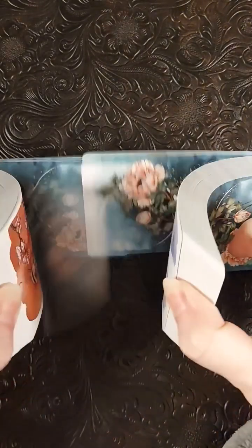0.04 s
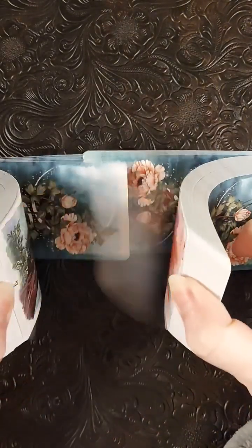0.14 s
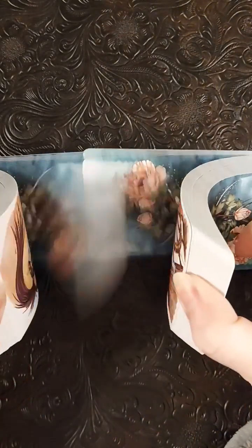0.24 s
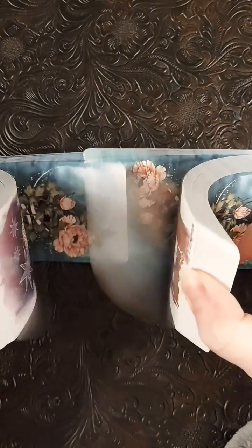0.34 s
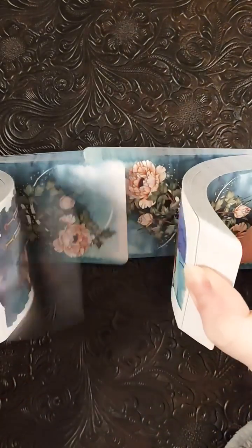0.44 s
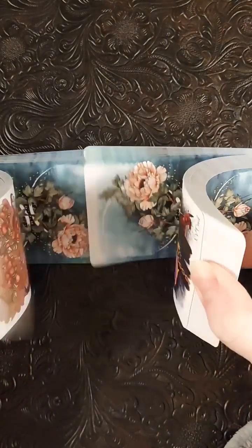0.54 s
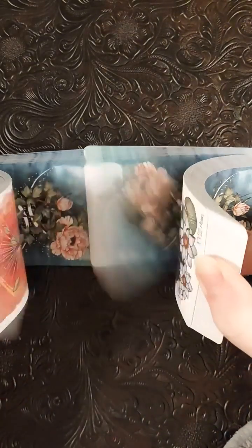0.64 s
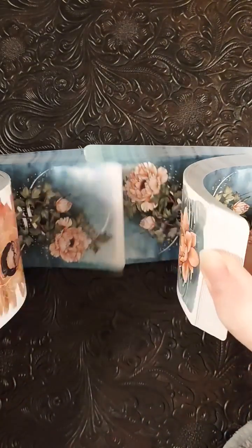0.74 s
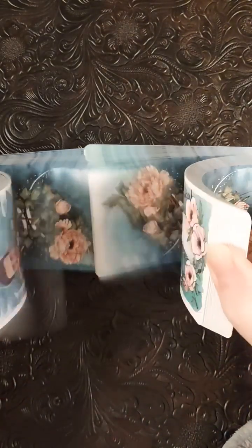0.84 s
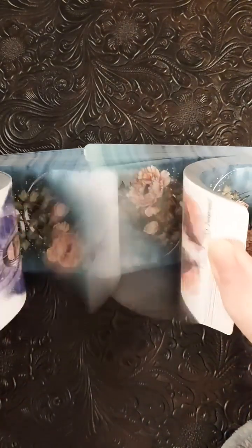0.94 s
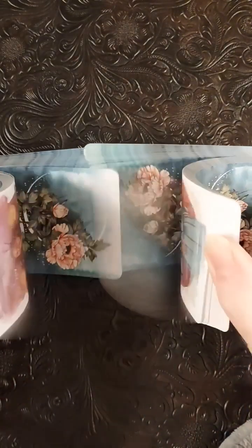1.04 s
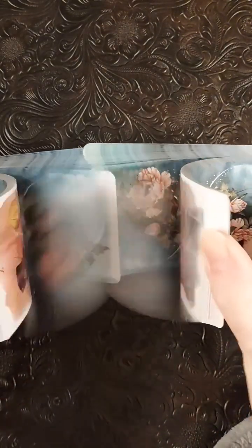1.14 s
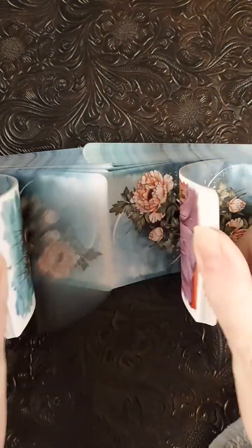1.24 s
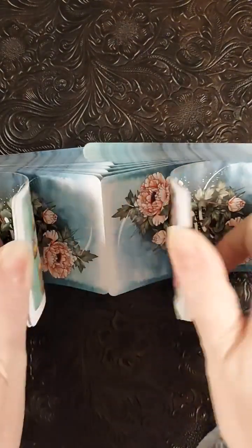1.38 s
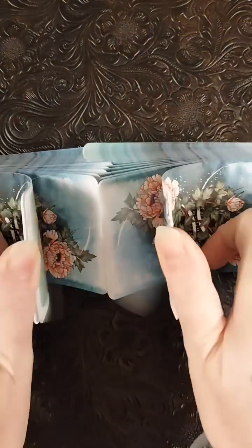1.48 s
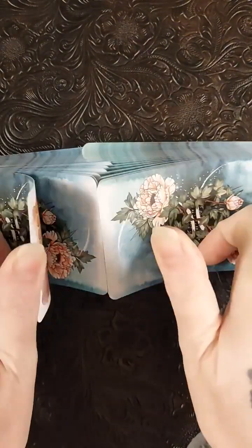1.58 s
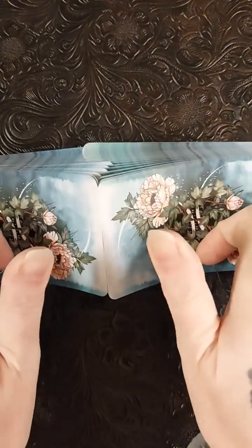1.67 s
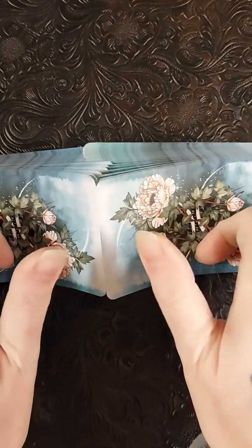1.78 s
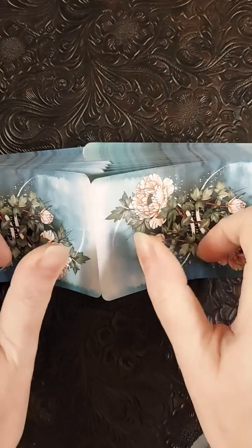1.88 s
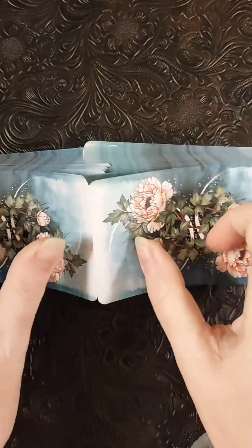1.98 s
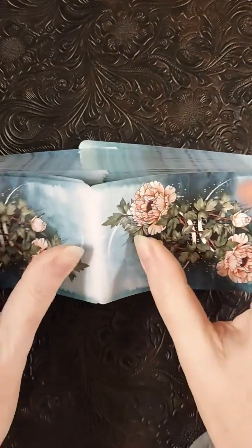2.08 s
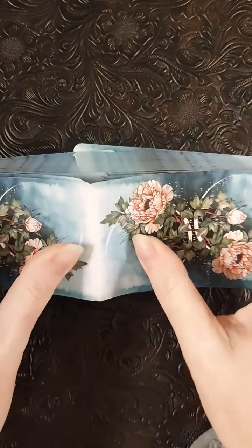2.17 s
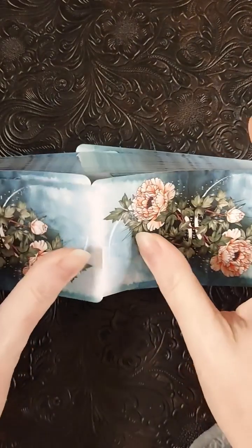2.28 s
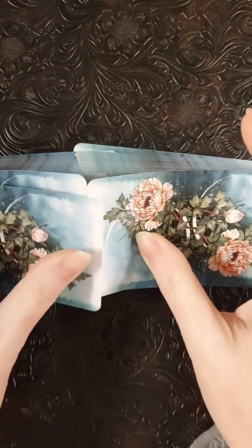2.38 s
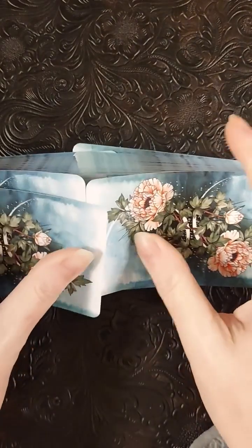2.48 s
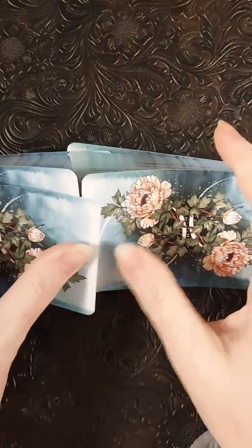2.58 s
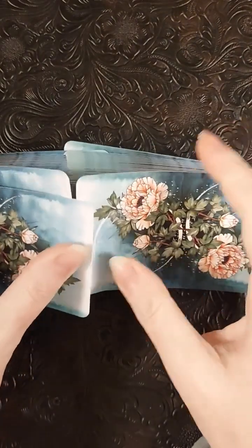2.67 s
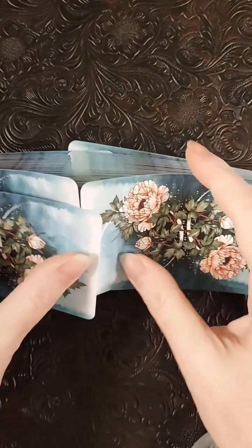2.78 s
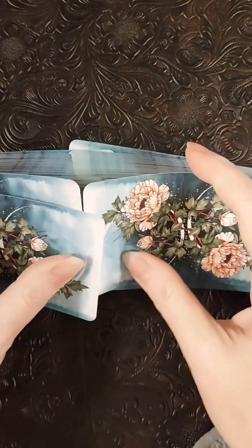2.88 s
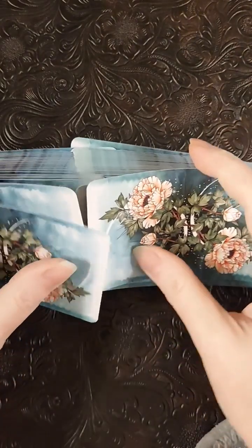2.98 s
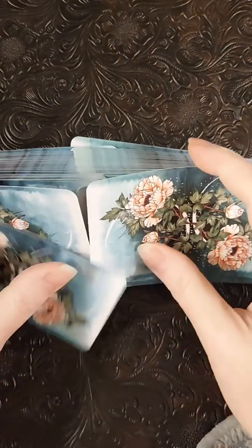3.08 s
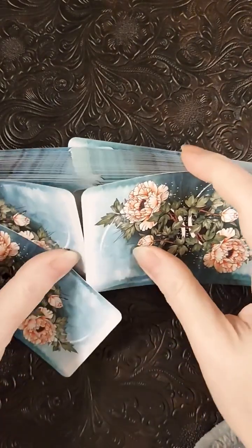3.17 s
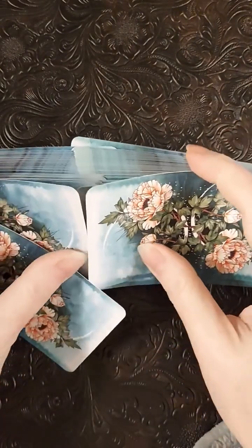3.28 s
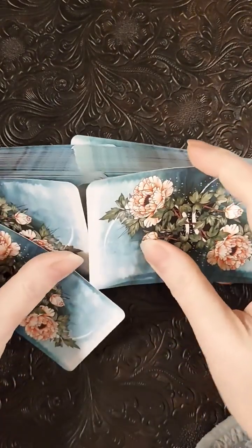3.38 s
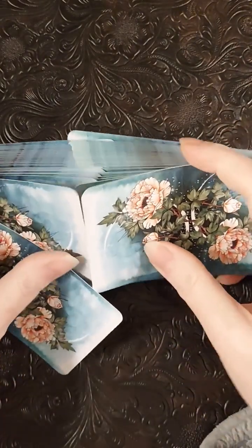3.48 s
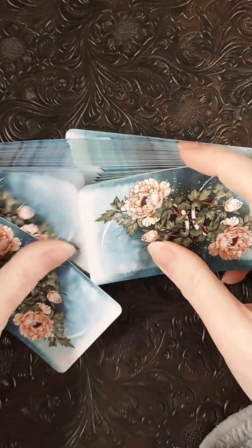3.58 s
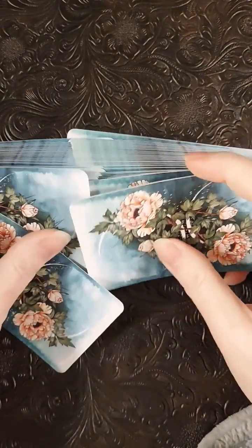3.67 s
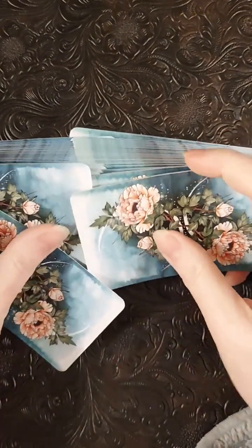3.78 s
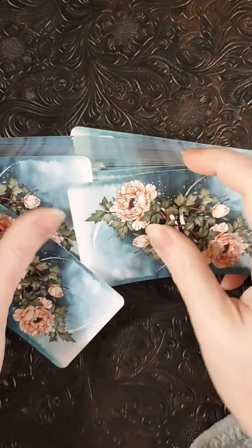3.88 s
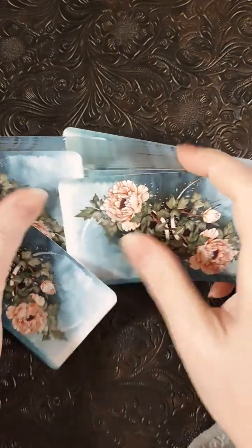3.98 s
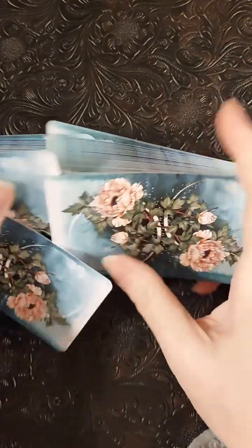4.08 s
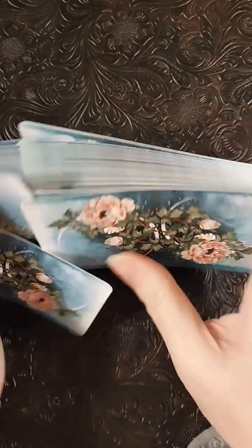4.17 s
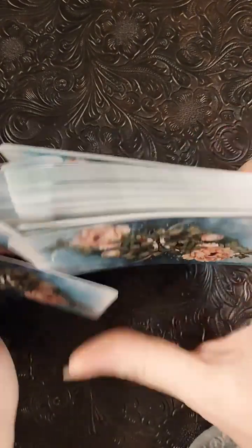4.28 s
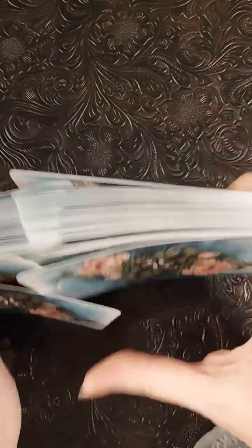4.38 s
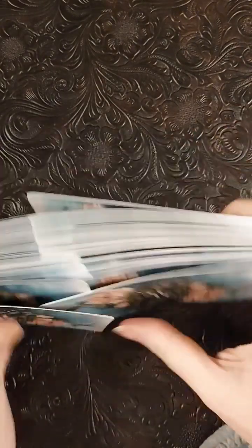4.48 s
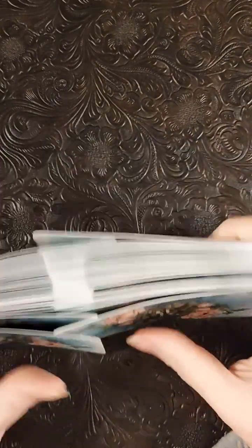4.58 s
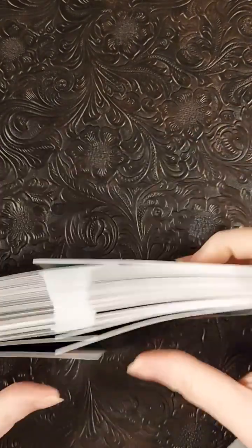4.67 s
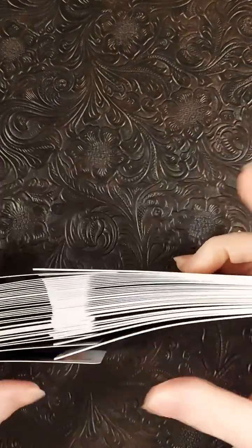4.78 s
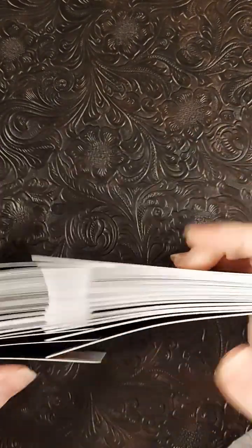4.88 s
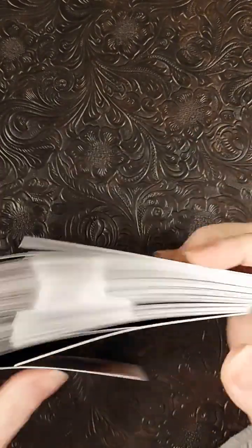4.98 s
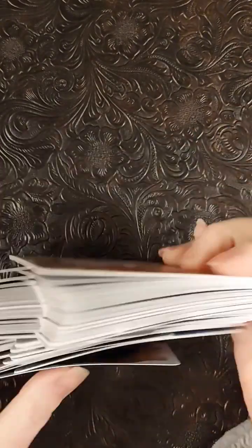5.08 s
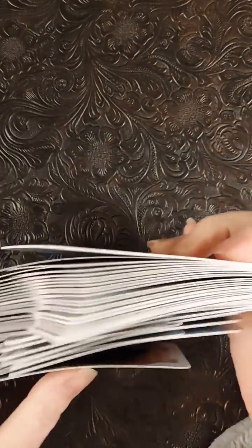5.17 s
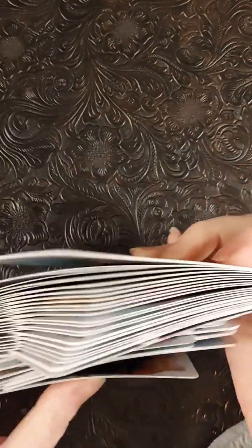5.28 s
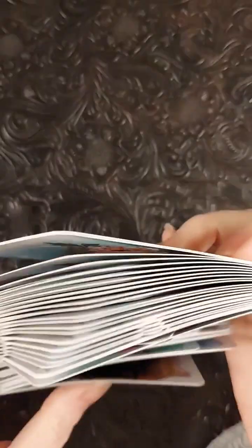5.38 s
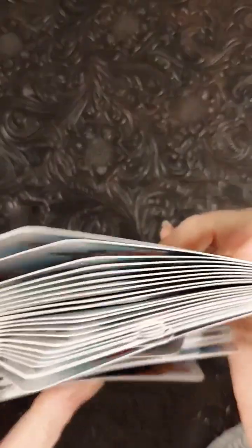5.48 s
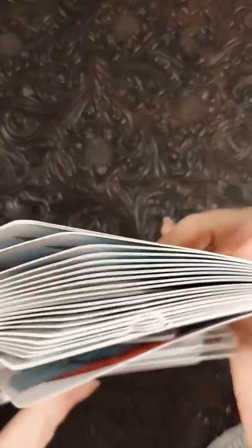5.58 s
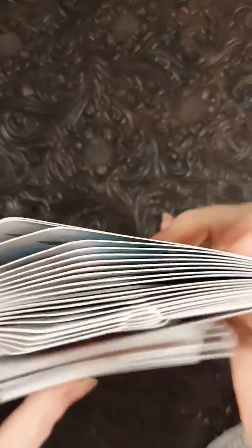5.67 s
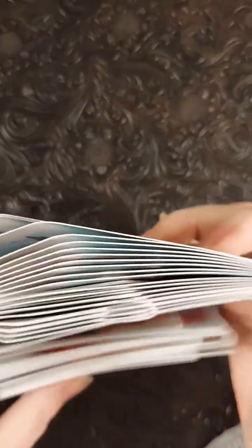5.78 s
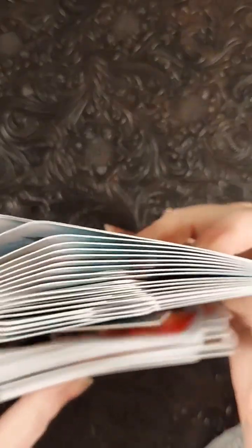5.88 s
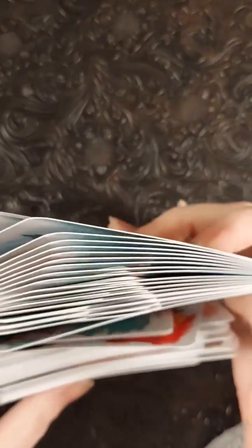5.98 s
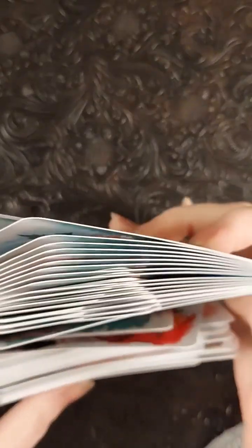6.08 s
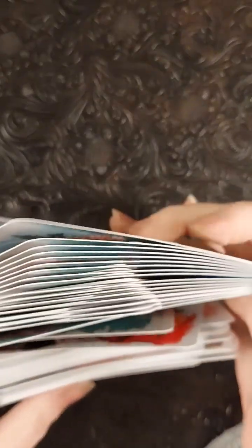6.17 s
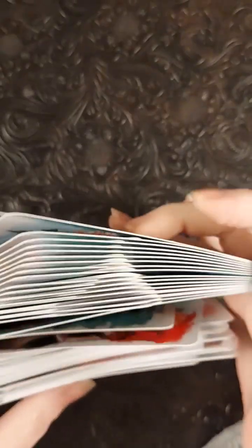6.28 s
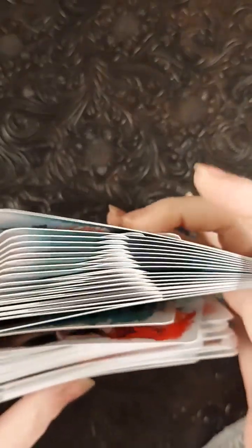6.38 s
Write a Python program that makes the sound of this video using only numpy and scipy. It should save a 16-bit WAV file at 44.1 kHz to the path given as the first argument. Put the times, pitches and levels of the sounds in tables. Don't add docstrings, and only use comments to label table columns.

```python
import sys
import numpy as np
from scipy import signal
from scipy.fft import rfft, irfft, next_fast_len
from scipy.io import wavfile
from scipy.ndimage import uniform_filter1d, map_coordinates

SR = 44100
rng = np.random.default_rng(int(sys.argv[2]) if len(sys.argv) > 2 else 0)


def pcm_store(signal):
    levels = np.round(np.clip(np.atleast_2d(signal), -1, 1) * 32767)
    wavfile.write(sys.argv[1], SR, levels.astype(np.int16).T)


def invert_db(level):
    return 10 ** (np.asarray(level, dtype=float) / 20)


N = 284004
LIFTED_S, LEFT_LEAD_SAMPLES = 4.25, 5
HUM_HZ = 91.5
LOW_RINGS_LONGER = 0.36
SOFT_LINGERS = 0.15
START_DB_PER_S, STOP_DB_PER_S = 419, 796.5
SKID_START_DB_PER_S, SKID_STOP_DB_PER_S = 1500.5, 2500

# (time [s], level [dB])
HUM_LEVEL = [(0, -53), (0.5, -61.5), (1, -54.5), (1.5, -59.5), (2, -55), (2.5, -56.5), (3, -52.5),
             (3.5, -53), (4, -52.5), (4.4, -60), (5, -54.5), (5.25, -56), (5.6, -61), (6, -64),
             (6.15, -80.5), (6.44, -72)]
# (multiple of its pitch, level [dB])
HUM_OVERTONES = [(1, -0.5), (2, -21)]
# (frequency [Hz], level [dB])
ROOM_COLOUR = [(12, -36), (20, -15), (60, 1.5), (108, -2), (189, -10.5), (258, -12), (535, -25.5),
               (670, -30.5), (2010, -33.5), (2510, -37), (2730, -35), (5210, -40), (14300, -48.5),
               (16000, -56.5)]
# (frequency [Hz], likeness [0-1])
ROOM_LIKENESS = [(30, .75), (60, 1), (200, 0.81), (600, 0.27), (2000, 0.11), (8000, 0.05)]
# (frequency [Hz], time to fall 60 dB [s])
ECHO_TIMES = [(150, 0.13), (1000, 0.24), (4500, 0.056), (8000, 0.12)]

# (full speed from [s], held [s], scrape [dB], hiss above scrape [dB])
FACE_STROKES = [(0, 0.56, -55, -2), (.76, 0.064, -54, -7.5), (0.9, 0.085, -56.5, -0.5),
                (1.26, .2, -67.5, -14), (1.47, 0.14, -58, 5), (1.862, 0.038, -57, -4.5),
                (1.911, 0.05, -59, 6.5), (2.089, 0.16, -61.5, 3), (2.995, 0.11, -64, 1),
                (3.13, 0.071, -70, 12), (3.219, 0.044, -62, -15), (3.49, 0.14, -68.5, -13),
                (3.675, 0.086, -61, -7), (5.09, 0.055, -55.5, 4.5), (3.89, 0.14, -62, -5),
                (4.05, 0.13, -70.5, -1), (4.315, 0.027, -60, -9.5), (4.49, 0.061, -55, 6),
                (4.568, 0.059, -48.5, -6), (4.66, 0.12, -66, 0.5), (5.005, 0.089, -55, 12.5),
                (5.16, 0.13, -59, 1), (5.3, 0.076, -56.5, 7.5), (5.398, 0.032, -45, -6.5),
                (5.47, 0.16, -63.5, -11), (5.65, 0.07, -61, 7.5), (5.753, 0.034, -57, 15),
                (5.82, 0.04, -60.5, 10.5), (5.89, 0.024, -47.5, -6.5), (5.969, 0.056, -64.5, 12),
                (6.17, 0.078, -75, -5), (6.428, 0.058, -61.5, -5.5), (1.899, 4.15, -75.5, -6.5)]
# (from [s], held [s], scrape [dB],
# hiss above scrape [dB])
CARD_SLITHERS = [(.036, 0.0074, -55.5, 9.5), (.112, 0.01, -61, 5), (.155, 0.011, -61, 0),
                 (.22, 0.019, -68, 8), (.252, .006, -62, 24), (.276, 0.01, -59, 9), (.312, .022, -65, 4),
                 (.39, 0.047, -52, 2), (.45, 0.025, -50.5, 12.5), (.512, 0.013, -54, 12),
                 (.547, 0.017, -67, 3), (.675, 0.016, -42, -1), (.722, 0.042, -54, -4),
                 (.772, 0.011, -34.5, 1), (.834, 0.0073, -63, 2), (.866, 0.018, -65, 2),
                 (.918, .008, -53, 12), (.942, 0.015, -50, 10.5), (.962, 0.012, -30.5, 0.5),
                 (1.004, 0.0097, -56, 22.5), (1.04, 0.027, -52.5, 12.5), (1.115, 0.0052, -56, -1),
                 (1.147, 0.019, -50, -1), (1.244, 0.0067, -44, 15), (1.262, 0.026, -52, 6),
                 (1.328, 0.011, -40, 9), (1.345, 0.013, -40.5, -4), (1.39, 0.059, -54.5, 6.5),
                 (1.452, 0.0064, -48, 14), (1.525, 0.009, -63, 1), (1.595, 0.0079, -55, 7),
                 (1.722, 0.029, -63.5, 2), (1.835, 0.018, -55.5, -7.5), (2.243, 0.016, -45, -8.5),
                 (2.056, 0.0058, -58.5, -3.5), (2.175, 0.0044, -58, -5.5), (2.32, 0.0041, -66.5, 5.5),
                 (3.23, 0.022, -68, -27), (4.97, 0.024, -60.5, 9), (5.035, 0.04, -58.5, 11.5),
                 (5.215, 0.083, -64, 11.5), (5.585, 0.04, -66.5, 15), (5.705, 0.031, -57.5, 11),
                 (5.915, 0.037, -59.5, 11.5), (6.0, 0.027, -67, 13), (6.028, 0.02, -57, 10),
                 (6.055, 0.011, -72, 9.5), (1.291, 0.012, -37, 11), (1.421, 0.0092, -42.5, 10.5),
                 (5.562, 0.024, -70.5, 14.5), (5.845, 0.01, -50, -5), (3.685, 0.014, -52, -8)]
# (time [s], share of lower resonance [0-1], treble above 9 kHz [dB])
RUB_COLOUR = [(0, 0.87, -0.5), (.9, 0.4, 3.5), (1.7, 0, 1), (1.85, 0.14, -19.5), (3.3, 0.27, -2),
              (3.7, 0.99, -9.5), (4.3, 1, -4), (4.6, 0.2, -5.5), (5.05, 0.16, 0.5), (5.3, 0.04, -11.5),
              (5.6, 0.45, 3), (5.72, 0.6, 0), (5.8, 0.1, -3), (5.93, 0.3, 5.5), (5.99, 0.6, 4.5),
              (6.05, .5, 4.5)]
# (frequency [Hz], level [dB])
SCRAPE_COLOUR = [(290, -44), (500, -3), (600, -28.5), (786, -8), (1050, -19), (1310, -14), (1890, -8.5),
                 (5000, -6), (6500, -34), (11000, -120)]
# (frequency [Hz], level [dB])
HISS_COLOUR = [(1760, -33), (3000, -5.5), (6860, -0.5), (8560, -3), (14000, -2), (15800, -9), (16200, -42)]

# (time [s], slap [dB], treble above slap [dB], card ring [Hz])
TRICKLING_CARDS = [(.0236, -45.5, -6.5, 2120), (.0322, -43, -7, 2120), (.0466, -33.5, 4.5, 1490),
                   (.0979, -19, 7.5, 3450), (.1164, -40.5, 0, 3300), (.1503, -27.5, 3, 1610),
                   (.1745, -35.5, 2, 2950), (.2055, -24, 11, 1080), (.2480, -39, 8.5, 705),
                   (.2714, -34.5, 4, 2280), (.3022, -47, -18, 2110), (.3235, -35, 3.5, 2980),
                   (.3423, -33, 3.5, 2870), (.3605, -46.5, 5, 1820), (.3811, -36, 7.5, 700),
                   (.4068, -35, 7, 1150), (.4413, -32.5, 0.5, 760), (.4637, -34.5, 2.5, 2140),
                   (.5087, -34.5, 6, 2850), (.5208, -34.5, 5, 2290), (.5621, -44, 10, 3060),
                   (.5904, -43.5, -0.5, 2000)]
# (time [s], slap [dB], treble above slap [dB], card ring [Hz])
WEAK_FLICKS = [(.064, -46, 1, 2038), (.078, -37, -5.5, 1600), (.227, -50.5, 5, 2924),
               (.496, -38, -7.5, 2122), (.5575, -43.5, 6, 2084), (.623, -39, 1.5, 2900),
               (.655, -43, -7, 2000), (.727, -36.5, -1, 2100), (.756, -39, -5.5, 2040),
               (.800, -39, -4.5, 1614), (.821, -42.5, -5.5, 1090), (.855, -47.5, -6.5, 2063),
               (.911, -40.5, -7, 1091), (.949, -35.5, -2.5, 2056), (.981, -38, -6, 2115),
               (1.042, -30.5, -9, 2900), (1.231, -38, -6.5, 1633), (1.247, -27, -0.5, 2120),
               (1.284, -29, -8, 2080), (1.329, -27.5, 3.5, 1585), (1.358, -43.5, -5.5, 2130),
               (1.433, -36, -10, 1613), (1.483, -48.5, -5.5, 2100)]
# (time [s], slap [dB], treble above slap [dB], card ring [Hz])
STREAMING_CARDS = [(.6117, -31, 3.5, 1680), (.663, -26, 0.5, 1640), (.7165, -26, 3, 1670),
                   (.7343, -27.5, 5, 3030), (.7652, -21, -1, 1525), (.828, -37.5, 5, 796),
                   (.8605, -23, 0, 1830), (.8934, -21, -2, 4160), (.9272, -21, 0, 1680),
                   (.9558, -17, -5.5, 2800), (.9703, -26, 3.5, 2940), (.9886, -23.5, -1.5, 1620),
                   (1.0, -25.5, -3.5, 1970), (1.0344, -17.5, -2.5, 2840), (1.0483, -26, -3.5, 2050),
                   (1.0785, -40.5, -1, 810), (1.089, -44, 3, 2880), (1.1107, -28.5, 5, 2140),
                   (1.1424, -19, -4, 2070), (1.1617, -22, 2.5, 2900), (1.1825, -35.5, -7, 2970),
                   (1.1950, -30, -1.5, 1780), (1.2052, -29, 0, 2120), (1.2388, -17, 1.5, 1755)]
# (time [s], slap [dB], treble above slap [dB], card ring [Hz])
LAST_CARDS = [(1.2884, -15.5, -3.5, 1780), (1.296, -22, 0.5, 2880), (1.3046, -22.5, -0.5, 2980),
              (1.3236, -23, 2, 2850), (1.3438, -28.5, -6, 2080), (1.3673, -18, 2.5, 2010),
              (1.4205, -24, -10, 1720), (1.4261, -20, 2, 2290), (1.4482, -27, 4, 760),
              (1.4914, -28.5, -2, 2830), (1.5078, -37.5, -5.5, 2340), (1.5215, -27.5, -4, 1900),
              (1.5514, -48, -1.5, 2090), (1.5638, -32.5, 0.5, 2040), (1.5869, -28.5, -3, 1930),
              (1.6313, -50, 3.5, 2930), (1.6442, -37.5, 2.5, 1750), (1.7047, -44.5, 5.5, 3090),
              (1.7176, -36.5, 4, 2030)]
# (time [s], level [dB])
AIR_PUSHES = [(.005, -47), (.046, -37), (.06, -42.5), (.098, -33), (.15, -40.5), (.175, -44.5), (.204, -34),
              (.247, -49), (.272, -47.5), (.324, -45), (.381, -46.5), (.407, -44.5), (.441, -43),
              (.509, -43.5), (.56, -44.5), (.612, -45), (.663, -43), (.717, -42), (.765, -45.5),
              (.818, -40), (.861, -43.5), (.893, -45), (.927, -41.5), (.956, -40), (.989, -41),
              (1.035, -41), (1.049, -39), (1.079, -40), (1.11, -38), (1.143, -42), (1.162, -41.5),
              (1.2, -42), (1.239, -39), (1.284, -33), (1.305, -35), (1.324, -36.5), (1.345, -39.5),
              (1.367, -41.5), (1.422, -39.5), (1.449, -43.5), (1.49, -45), (1.521, -49.5), (1.56, -45),
              (1.587, -44), (1.644, -58), (1.717, -47)]
# (time [s], level [dB])
FANNING = [(0, -51), (.3, -56.5), (.6, -52.5), (1.25, -46.5), (1.4, -57), (1.55, -73), (1.8, -100)]
# (frequency [Hz], level [dB])
DRAUGHT_COLOUR = [(15, -31), (40, -8.5), (100, -7), (160, -5), (260, -38)]
# (frequency [Hz], level [dB])
SLAP_COLOUR = [(290, -40), (500, -7), (794, -2.5), (1340, -9.5), (1620, 0), (2120, 1.5), (2620, -4.5),
               (2980, 2), (3570, -7), (4010, -9), (5000, -18.5), (6500, -40), (11000, -120)]
# (frequency [Hz], level [dB])
TREBLE_COLOUR = [(2060, -33.5), (3500, 4), (5880, 2), (9320, -2.5), (10700, -5), (13500, -0.5),
                 (15800, -8.5), (16200, -36)]
# (frequency [Hz], level [dB])
PUFF_COLOUR = [(60, -55.5), (140, 0.5), (220, 3), (350, 5), (600, -7.5), (900, -13.5), (1300, -40.5)]
# (frequency [Hz], level [dB])
CARD_TONES = [(825, -8), (1110, -9.5), (1620, -10.5), (2070, -8.5), (2490, -10.5), (2860, -3),
              (4020, -11.5), (4460, -14.5), (5750, -13.5)]

# (time [s], slap [dB], treble above slap [dB], card ring [Hz])
EDGE_TAPS = [(2.1296, -51.5, 0.5, 873), (2.193, -50.5, 0, 2770), (2.2060, -47, -1, 2840),
             (2.2265, -50, -3, 2470), (2.2348, -41.5, 4.5, 2710), (2.2795, -56, 3, 1783),
             (2.53, -55.5, -8.5, 2754), (2.8039, -44.5, -7.5, 1860), (2.9897, -32, -6, 2007),
             (3.2028, -55, -17, 2360), (3.2253, -49.5, 1.5, 984), (3.2572, -37, -19, 1956),
             (3.2779, -44.5, -3.5, 2073), (3.5486, -53, -8, 1458), (3.6506, -39.5, -7.5, 960),
             (3.6705, -30, -1, 1723), (4.2945, -54.5, -22.5, 1448), (4.316, -57.5, 3.5, 2060),
             (4.4272, -53, -0.5, 2390), (2.155, -55, -2.5, 2003), (3.213, -63, -10, 1190),
             (3.679, -39.5, -9, 1990)]
# (time [s], slap [dB], treble above slap [dB], card ring [Hz])
SQUARING_TAPS = [(4.5572, -39, -3.5, 820), (4.5897, -35.5, -8, 2200), (4.6028, -35, -9, 2010),
                 (4.6144, -36.5, -6, 2130), (4.6457, -34, -9, 2040), (4.6525, -34, -8.5, 894),
                 (4.761, -63, 13, 3240), (5.2245, -55, -2, 2780), (5.3646, -37.5, -4.5, 2650),
                 (5.3739, -38, -13, 2710), (5.3938, -33, -29, 667), (5.4034, -39, -15, 830),
                 (5.4217, -38.5, -4, 1990), (5.6419, -43, -13, 2040), (5.686, -48, 4.5, 1680),
                 (5.698, -46.5, -4, 2100), (5.7907, -43, -8, 2200), (5.8262, -33, -11, 832),
                 (5.8392, -30, -15, 1304), (5.8856, -41.5, -11, 2640), (5.8925, -44.5, -12, 2240),
                 (5.9065, -50, -7, 2270), (5.9697, -43.5, -1, 665), (4.663, -42.5, -7.5, 850),
                 (5.3878, -31, -16, 640), (5.44, -49.5, -9.5, 2430), (5.503, -60.5, -12, 2130),
                 (5.4143, -39.5, -8.5, 2250), (5.914, -50, -8, 2250)]
# (time [s], peak [dB], thud [Hz], time to fall 60 dB [s])
DESK_KNOCKS = [(4.56, -26, 201, 0.013), (4.607, -18, 163, 0.012), (4.616, -26.5, 256, 0.043),
               (4.6531, -7, 170, 0.019), (4.677, -38, 150, 0.21), (5.366, -36, 153, 0.12),
               (5.376, -10, 165, 0.0077), (5.388, -18, 166, 0.015), (5.421, -36.5, 156, 0.11),
               (5.645, -35, 255, 0.033), (5.794, -41.5, 249, 0.062), (5.828, -36, 169, 0.073),
               (5.841, -25.5, 224, 0.039), (5.889, -35, 176, 0.031), (5.91, -41.5, 154, 0.11),
               (5.971, -37, 245, 0.042)]
# (frequency [Hz], width [Hz], level [dB])
DESK_TONES = [(850, 47, -23.5)]


def unit(x):
    return x / np.sqrt(np.mean(x ** 2) + 1e-20)


def along(points, hz):
    f, v = np.transpose(points)
    return np.interp(np.log(hz + 1), np.log(f + 1), v)


def curves(rows):
    s, *cols = np.transpose(rows)
    return [np.interp(np.arange(N) / SR, s, c) for c in cols]


def wobble(rate):
    knots = rng.standard_normal(int(N * rate / SR) + 4)
    return map_coordinates(knots, [np.arange(N) * rate / SR], order=1)


def filtered(x, response):
    m = next_fast_len(N + SR // 4)
    return irfft(rfft(x, m) * response(np.fft.rfftfreq(m, 1 / SR)), m)[..., :N]


def resonance(hz, centre, width):
    return 1j * hz * width / (centre * centre - hz * hz + 1j * hz * width)


def ports(x):
    late = np.roll(x, LEFT_LEAD_SAMPLES)
    return np.array([x, np.where(np.arange(N) < LIFTED_S * SR, late, x)])


def rush(spectrum, alike, grain_db, grain_rate, patchy_db):
    share = np.clip(alike, 0, 1)
    common = np.sqrt(share) * ports(rng.standard_normal(N))
    pair = common + np.sqrt(1 - share) * rng.standard_normal((2, N))
    z = signal.stft(pair * invert_db(grain_db * wobble(grain_rate)), nperseg=256)[2]
    chance = rng.standard_normal(z.shape[1:])
    patches = uniform_filter1d(uniform_filter1d(chance, size=7, axis=0), size=4, axis=1)
    streaks = uniform_filter1d(chance, size=9, axis=1)
    field = unit(patches) + 0.87 * unit(streaks)
    patchy = z * invert_db(patchy_db * np.minimum(unit(field), 1))
    pair = signal.istft(patchy, nperseg=256)[1][:, :N]
    return unit(filtered(pair, lambda hz: invert_db(along(spectrum, hz))))


def room():
    def colour(hz):
        turn = np.arccos(np.clip(along(ROOM_LIKENESS, hz), -1, 1)) / 2
        return invert_db(along(ROOM_COLOUR, hz)) * [np.cos(turn), np.sin(turn)]

    mid, side = filtered(rng.standard_normal((2, N)), colour)
    after_riffle = np.maximum(np.arange(N) / SR - 1.7, 0)
    settle_db = -6 * np.exp(-after_riffle / 1.14)
    tone = invert_db(-59.0 + settle_db + 0.66 * wobble(6.6)) * unit(np.array([mid + side, mid - side]))

    hum_db, = curves(HUM_LEVEL)
    phase = 2 * np.pi * np.cumsum(HUM_HZ + 1.5 * wobble(8)) / SR
    hum = np.zeros(N)
    for multiple, db in HUM_OVERTONES:
        gain = invert_db(hum_db + db + 0.77 * wobble(6.8))
        hum += gain * np.sqrt(2) * np.sin(multiple * phase)
    return tone + hum


def strokes(rows, start_db_per_s, stop_db_per_s):
    s, held, db, hiss_db = np.transpose(rows)[:, :, None]
    t = np.arange(0, N / SR + .002, .002)
    speed_db = -start_db_per_s * np.maximum(s - t, 0) - stop_db_per_s * np.maximum(t - s - held, 0)

    def total(level_db):
        return np.sqrt(np.sum(invert_db(level_db + speed_db) ** 2, axis=0))

    return np.array(curves(np.transpose([t, total(db), total(db + hiss_db)])))


def slide():
    long_rubs = strokes(FACE_STROKES, START_DB_PER_S, STOP_DB_PER_S)
    short_skids = strokes(CARD_SLITHERS, SKID_START_DB_PER_S, SKID_STOP_DB_PER_S)
    scrape_gain, hiss_gain = np.hypot(long_rubs, short_skids)
    low, treble_db = curves(RUB_COLOUR)
    low = np.clip(low, 0, 1)
    catch_db = 0.68 * wobble(54)

    def rub(x, centre, width):
        return unit(filtered(x, lambda hz: 0.053 + resonance(hz, centre, width)))

    grit = rush(SCRAPE_COLOUR, 0.53, 2.5, 600, 4)
    scrape = low * rub(grit, 1350, 270) + (1 - low) * rub(grit, 2000, 700)
    hiss = rush(HISS_COLOUR, 0.16, 0.51, 1200, 3.2)
    above_9k = filtered(hiss, lambda hz: 1 / (1 + (9000 / (hz + 1)) ** 6))
    hiss = hiss + (invert_db(treble_db) - 1) * above_9k
    return scrape_gain * invert_db(catch_db) * scrape + hiss_gain * invert_db(0.36 * catch_db) * hiss


def contacts(rows, puff_db, puff_slope, t60):
    s, db, treble_db, hz = np.transpose(rows)
    s = s + .0009
    soft_db = -30.0 - db
    decay_s = t60 * (2000 / hz) ** LOW_RINGS_LONGER * invert_db(SOFT_LINGERS * soft_db)
    return np.transpose([s, db, treble_db, puff_db + puff_slope * soft_db, decay_s, hz])


def slaps(rows, noise_db, ring_db, modes_db, rise_s, lead_in_db, crack):
    lead = 400
    t = (np.arange(2600) - lead) / SR
    before, after = np.minimum(t, 0), np.maximum(t, 0)
    body, treble, ring = np.zeros((3, N + len(t)))
    rise = invert_db(60 * before / rise_s) + invert_db(lead_in_db + 60 * before / 0.023)
    tone_hz, tone_db = np.transpose(CARD_TONES)[:, :, None]
    dying = invert_db(tone_db + modes_db - 0.12 * tone_hz * after)
    strike = 1 + 0.48 * invert_db(-60 * after / 0.0027)
    chances = rng.standard_normal((len(rows), 2, len(CARD_TONES), 1))

    for (s, db, treble_db, _, t60, hz), (loud_chance, pitch_chance) in zip(rows, chances):
        start = round(s * SR)
        at = slice(start, start + len(t))
        snap = 1 + crack * invert_db(.5 * (db + 13.5) - 60 * np.abs(t - .0008) / 0.0065)
        fall = snap * invert_db(-60 * after / t60) + invert_db(-23.5 - 60 * after / 0.027)
        body[at] += (invert_db(db + noise_db) * rise * fall) ** 2
        treble_fall = fall * invert_db(-350 * after)
        treble[at] += (invert_db(db + treble_db - 0.5) * rise * treble_fall) ** 2

        tones = np.sin(2 * np.pi * tone_hz * (1 + 0.019 * pitch_chance) * t)
        tones = np.sum(dying * invert_db(3.9 * np.clip(loud_chance, -1.5, 1.5)) * tones, axis=0)
        ring_gain = invert_db(db + ring_db - 60 * after / t60) * rise * strike
        ring[at] += ring_gain * unit(np.sin(2 * np.pi * hz * t) + tones)

    body, treble = np.sqrt([body, treble])[:, lead:lead + N]
    cards = body * rush(SLAP_COLOUR, 0.62, 2.4, 900, 3)
    cards = cards + treble * rush(TREBLE_COLOUR, 0.15, 1.3, 1500, 5.5)
    return (cards + ports(ring[lead:lead + N])) * invert_db([[-.7], [.7]])


def pushes(rows, rise_s, t60):
    lead = 400
    t = (np.arange(4400) - lead) / SR
    shape = invert_db(60 * np.minimum(t - .0025, 0) / rise_s - 60 * np.maximum(t, 0) / t60) ** 2
    power = np.zeros(N + len(t))
    for s, db in rows:
        power[round(s * SR):][:len(t)] += invert_db(db) ** 2 * shape
    return np.sqrt(power[lead:lead + N]) * rush(PUFF_COLOUR, 0.6, 0.54, 200, 2.7)


def riffle():
    fan_db = curves(FANNING)[0] + 2.2 * wobble(25)
    draught = invert_db(fan_db) * rush(DRAUGHT_COLOUR, 0.72, .3, 62, 0.95)
    rows = np.vstack([contacts(TRICKLING_CARDS, 0, 0, t60=0.029),
                      contacts(STREAMING_CARDS, 0, 0, t60=0.035),
                      contacts(LAST_CARDS, 0, 0, t60=0.026),
                      contacts(WEAK_FLICKS, 0, 0, t60=0.022)])
    cards = slaps(rows, noise_db=-3.0, ring_db=-6.5, modes_db=-5.5, rise_s=.006, lead_in_db=-14.5, crack=0.46)
    return cards + pushes(AIR_PUSHES, rise_s=0.031, t60=0.097) + draught


def taps():
    rows = np.vstack([contacts(EDGE_TAPS, puff_db=-15, puff_slope=-0.067, t60=0.031),
                      contacts(SQUARING_TAPS, puff_db=6, puff_slope=-0.23, t60=0.031)])
    puffs = np.transpose([rows[:, 0], rows[:, 1] + rows[:, 3]])
    air = pushes(puffs, rise_s=0.006, t60=0.086)
    return air + slaps(rows, noise_db=-4.5, ring_db=-2.5, modes_db=-4.5,
                       rise_s=0.00539, lead_in_db=-33.0, crack=0.636)


def knocks():
    thud, blows = np.zeros(N + SR), np.zeros(N)
    t = np.arange(SR // 5) / SR
    for s, db, hz, t60 in DESK_KNOCKS:
        deep = .5 * np.sin(2 * np.pi * 98 * t) * invert_db(22 * t / t60)
        push = np.sin(2 * np.pi * hz * t) + deep
        onset = 1 - np.exp(-(t / 0.0028) ** 2)
        thud[round(s * SR):][:len(t)] += invert_db(db + 6.5 - 60 * t / t60) * push * onset
        blows[round(s * SR)] = invert_db(db + 38.5)

    def desk_top(hz):
        return sum(invert_db(db) * resonance(hz, centre, width) for centre, width, db in DESK_TONES)

    def radiated(hz):
        return (1j * hz / (45 + 1j * hz)) ** 2

    return ports(filtered(thud[:N], radiated) + filtered(blows, desk_top))


def lean(hz):
    bump = np.exp(-np.log((hz + 1) / 340) ** 2 / 0.31) * [[-1], [1]]
    notch_db = -11 * np.exp(-((hz - 3680) / 170) ** 2)
    return invert_db(1.8 * bump + notch_db) * np.exp(0.3j * bump)


def walls(x):
    hz, t, z = signal.stft(rng.standard_normal((2, SR // 3)), SR, nperseg=256)
    fading = z * invert_db(-60 * t / along(ECHO_TIMES, hz)[:, None])
    tail = signal.istft(fading, SR, nperseg=256)[1]
    return signal.fftconvolve(x, tail / np.linalg.norm(tail[0]), axes=1)[:, :N]


def scene():
    deck = filtered(riffle() + taps() + knocks(), lean)
    return deck + invert_db(-15.0) * walls(deck) + slide() + room()


def band_limit(x):
    return signal.sosfilt(signal.butter(12, 16810, fs=SR, output="sos"), x)


def record(dry):
    mix = dry / (1 + np.abs(dry / .9) ** 6) ** (1 / 6)
    return band_limit(mix)


dry = scene()
out = record(dry)
pcm_store(out)
```